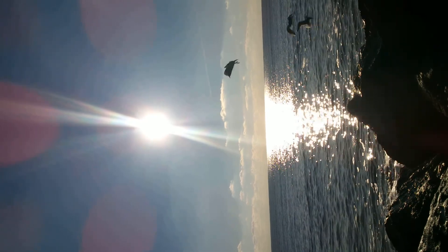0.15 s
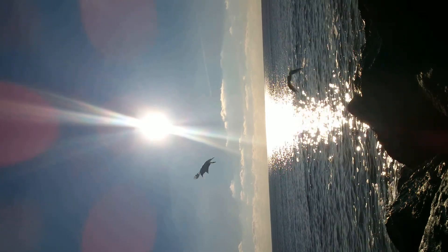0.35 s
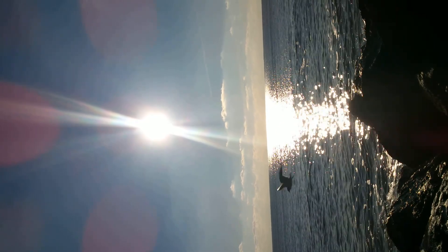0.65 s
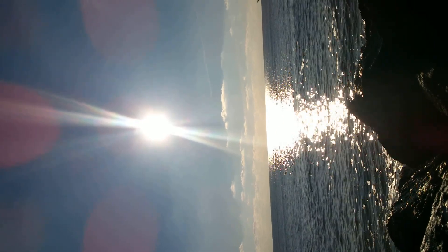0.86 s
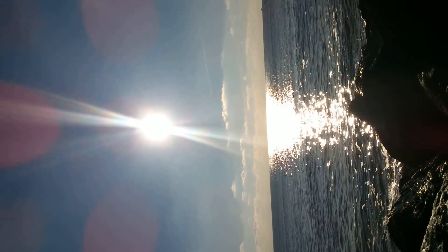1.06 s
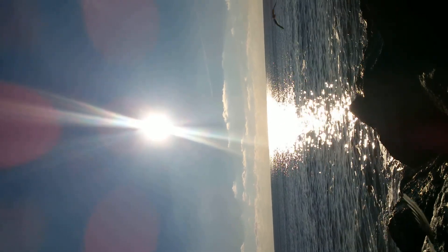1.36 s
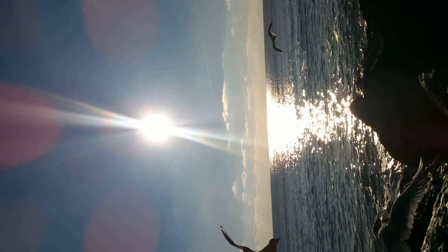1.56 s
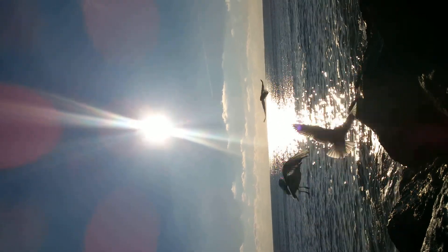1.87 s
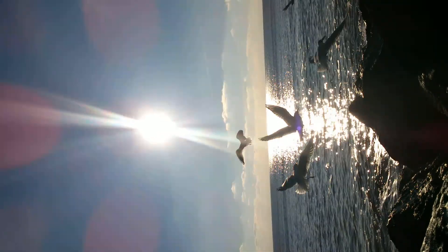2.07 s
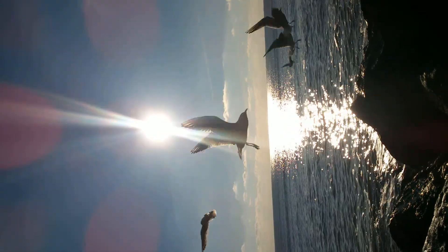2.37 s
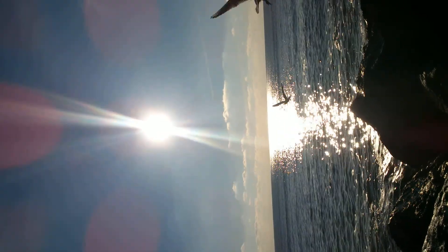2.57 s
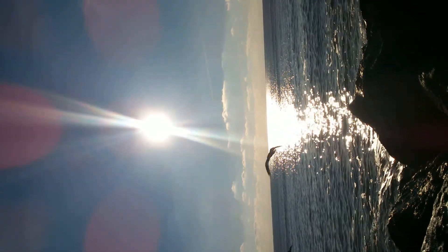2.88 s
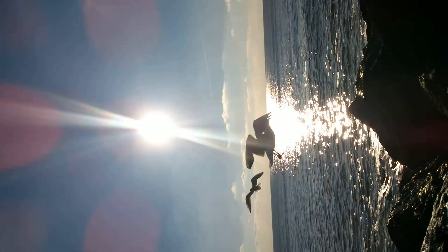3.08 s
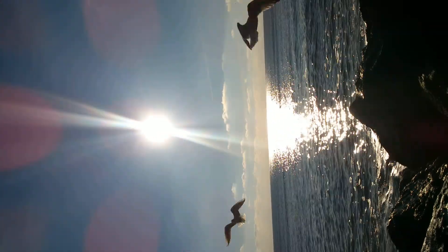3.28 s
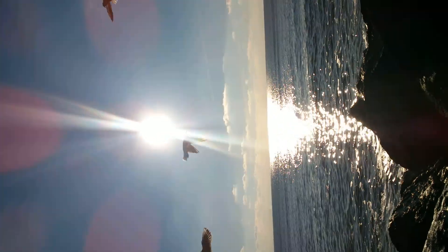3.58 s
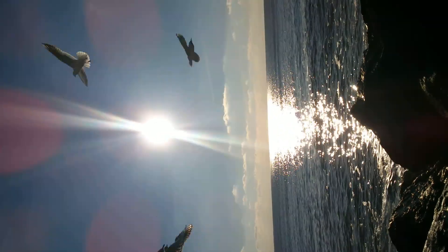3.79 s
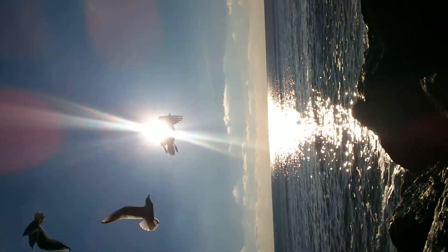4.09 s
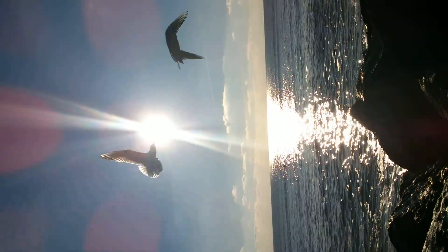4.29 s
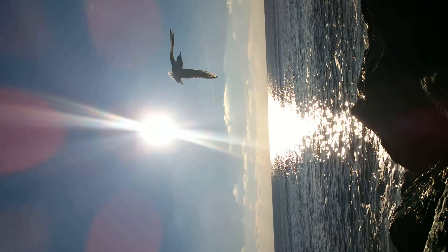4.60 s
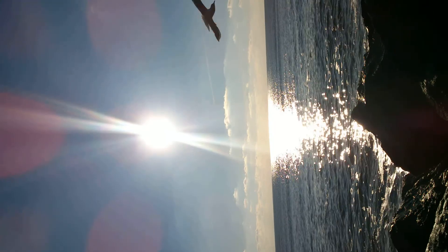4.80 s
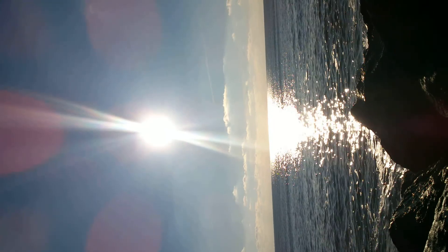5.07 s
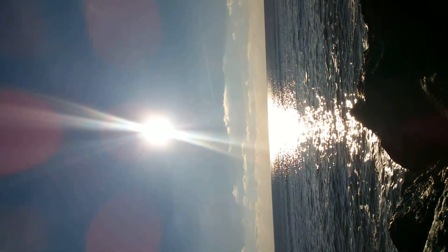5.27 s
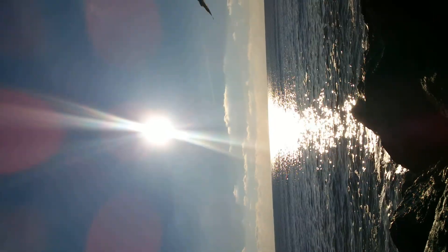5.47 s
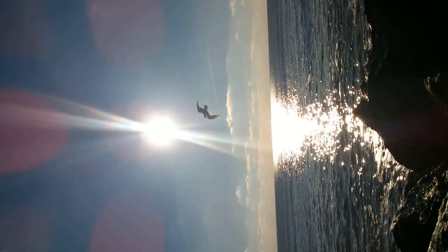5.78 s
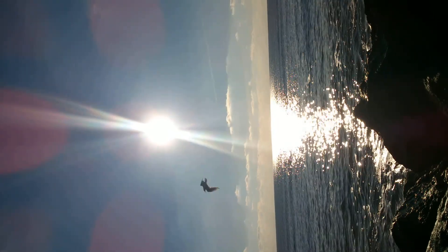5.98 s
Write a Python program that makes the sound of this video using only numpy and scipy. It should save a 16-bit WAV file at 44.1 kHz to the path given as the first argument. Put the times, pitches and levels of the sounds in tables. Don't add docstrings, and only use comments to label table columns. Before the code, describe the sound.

At once a close gull is heard mid-cry: a strained, rasping, throbbing call falling in pitch and stopping by 0.3 s. Wind bumps and low rumble dominate until soft, dark mews at about 1.25, 1.3 and 1.5 s. A stronger yelp comes at 1.85, then the loudest near yaps at 2.05, 2.27 and 2.45 s, bright and open, with a hoarse catch. Duller, turned-away yaps follow at 2.75, 3.05, 3.3 and 3.7 s, the last joined by a hoarse squawk. From 3.9 to 4.25 s short notes overlap in a warbling chatter further off, trailing into faint breathy notes until 4.7 s. Afterwards only wind thumps and surf remain to about 6.1 s. Distant surf hiss slowly recedes throughout; tiny dull or bright ticks fall between 0.95 and 2.2 s. Short dull echoes follow the calls; the small microphone sounds nearly mono, with limited treble.

```python
import sys
import numpy as np
from scipy import signal
from scipy.io import wavfile
from scipy.ndimage import uniform_filter1d

SR = 44100
rng = np.random.default_rng(int(sys.argv[2]) if len(sys.argv) > 2 else 0)


def rack_gain(trim_db):
    fader = np.asarray(trim_db, float)
    return 10 ** (fader / 20)


def transcribe(u):
    v = np.clip(np.atleast_2d(u).T, -1, 1)
    q = np.round(v * 32767).astype(np.int16)
    wavfile.write(sys.argv[1], SR, q)


N = 270774


def rms_one(x):
    return x / np.sqrt(np.mean(x ** 2) + 1e-20)


def in_time(rows, t):
    s, *columns = np.transpose(rows)
    return [np.interp(t, s, c) for c in columns]


def wander(rate_hz, size, count=1):
    r = np.exp(-2 * np.pi * rate_hz / SR)
    white = rng.standard_normal((count, size + 3000))
    slow = signal.lfilter([1], [1, -2 * r, r * r], white)[:, 3000:]
    return np.squeeze(rms_one(slow))


def band(x, low_hz, high_hz, order=2):
    return signal.sosfilt(signal.butter(order, [low_hz, high_hz], "band", fs=SR, output="sos"), x)


def resonance(x, hz, width_hz):
    block = 128
    r, hz = np.exp(-np.pi * width_hz / SR), np.broadcast_to(hz, x.shape)
    out, state = np.zeros(len(x)), np.zeros((2, 2))
    for i in range(0, len(x), block):
        turn = -2 * r * np.cos(2 * np.pi * hz[i] / SR)
        stage = [(1 - r * r) / 2, 0, (r * r - 1) / 2, 1, turn, r * r]
        out[i:i + block], state = signal.sosfilt([stage, stage], x[i:i + block], zi=state)
    return out


def voice(rows, throat, widths_hz, flutter, flutter_hz, tracking, valley_hz, top_hz,
          airy, chest_db, chest_hz, uneven_db):
    first, last = max(0, round(rows[0][0] * SR) - 200), round(rows[-1][0] * SR) + 200
    t = np.arange(first, last) / SR
    size = len(t)
    pitch_hz, level_db, opening_db, rasp_db = in_time(rows, t)
    low_hz, middle_hz, high_hz, middle_db, high_db, hoarse = throat
    hoarse = np.clip(hoarse + 0.024 * (level_db.max() - level_db), 0, .95)

    throb_hz = np.linspace(*flutter_hz, size) * (1 + .03 * wander(30, size))
    slip = (.27 + np.cumsum(throb_hz) / SR) % 1
    throb = rms_one(1 - np.clip(flutter, 0, .97) * slip ** 5.8)

    wobble = .05 * hoarse * wander(250, size) + .008 * wander(60, size)
    phase = 2 * np.pi * np.cumsum(pitch_hz * (1 + wobble)) / SR
    orders = np.arange(1, 31)[:, None]
    uneven = rack_gain(uneven_db * wander(40, size, count=30))
    partials = uneven * np.cos(orders * phase) * (orders * pitch_hz < 12000)
    pulses = rms_one(np.sum(partials, axis=0))
    pulses *= rack_gain(6 * hoarse * wander(300, size))
    breath = rms_one(rng.standard_normal(size) * (4.9 + np.cos(phase - 1)) ** 2)
    source = np.sqrt(1 - hoarse ** 2) * pulses + hoarse * breath

    low_hz = low_hz * (pitch_hz / pitch_hz.mean()) ** tracking
    low = rms_one(resonance(source, low_hz, widths_hz[0]))
    middle = rack_gain(middle_db) * rms_one(resonance(source, middle_hz, widths_hz[1]))
    half_hz = widths_hz[2] / 2
    high = rack_gain(high_db) * rms_one(band(source + airy * breath, high_hz - half_hz, high_hz + half_hz))
    upper = signal.lfilter(*signal.iirnotch(valley_hz, 4.0, fs=SR), high - middle)
    chest = rack_gain(chest_db) * rms_one(band(source, chest_hz, chest_hz + 700, order=3))
    sound = low + chest + rack_gain(opening_db) * upper * throb ** .7

    even = np.sqrt(uniform_filter1d(sound ** 2, size=900, mode="reflect") + 1e-9)
    rasp = rack_gain(rasp_db) * rms_one(band(band(breath, 6400, 22000, order=4), 5000, top_hz))
    edges = np.minimum(1, np.minimum(t - t[0] + (first == 0), t[-1] - t) * SR / 400)
    out = np.zeros(N)
    out[first:last] = (sound / even * rack_gain(level_db) + rasp * throb) * throb ** .7 * edges
    return out


# scoop before the top and sag after it [share of pitch per s],
# place of peak effort [0-1], fade at the ends [dB]
LEVEL, ARCHED, WARBLED = (3, 1.9, .42, 22), (6.5, 7.5, 0.46, 20), (5, 5, .55, 10)


def arch(note, manner, bill):
    round_s, loud_db = .01, -39.5
    top_s, rise_s, fall_s, top_hz, level_db = note
    scoop, sag, peak, fade_db = manner
    opening_db, rasp_db, _ = bill
    share = np.linspace(0, 1, 21)
    lag = share * (rise_s + fall_s) - rise_s
    pitch_hz = top_hz * np.exp(-np.where(lag < 0, scoop, sag) * (np.hypot(lag, round_s) - round_s))
    away = np.where(share < peak, 1 - share / peak, (share - peak) / (1 - peak))
    effort_db = level_db - loud_db - fade_db * away ** 2.17
    return np.transpose([top_s + lag, pitch_hz, loud_db + effort_db, opening_db + 0.23 * effort_db,
                         loud_db + rasp_db + 1.7 * effort_db])


def call(notes, manner, bill, throat):
    out = np.zeros(N)
    for note in notes:
        out += voice(arch(note, manner, bill), throat, (800, 950, 1600), flutter=0.38, flutter_hz=(80, 70),
                     tracking=0.073, valley_hz=5640, top_hz=bill[2], airy=.2, chest_db=-13, chest_hz=490,
                     uneven_db=4.5)
    return out


# t/s, pitch f/Hz, level/dB, bill opening/dB
LONG_CRY = [
    (0.0, 389.4, -43, -18),
    (0.013, 401, -39, -4),
    (0.032, 413.6, -38.5, -5.5),
    (0.079, 396.7, -38.5, 1),
    (0.13, 390, -36.5, -2.5),
    (0.242, 322.7, -40, 3),
    (0.262, 311.2, -41, 2),
    (0.299, 299.8, -61, 0),
]


def long_cry():
    rows = [(*row, row[2] - 62) for row in LONG_CRY]
    # low, middle, high f/Hz, middle, high level/dB, hoarseness 0 clear to 1 all breath
    throat = (1853, 2830, 6440, -3.5, -1.5, .22)
    return voice(rows, throat, (330, 530, 1700), flutter=.82, flutter_hz=(60, 40.3), tracking=0.91,
                 valley_hz=4300, top_hz=9300, airy=.6, chest_db=-3, chest_hz=1280, uneven_db=1.2)


# t/s, level/dB
SURF = [
    (0.0, -46.5),
    (0.1, -47),
    (0.26, -50),
    (0.63, -51.5),
    (3.98, -54.5),
    (4.05, -54),
    (6.14, -57),
]
# f/Hz, level/dB per Hz
SURF_COLOUR = [(88, -30), (150, -9), (314, -5), (402, -16), (532, -12.5), (581, -11), (635, -15),
               (730, -11.5), (798, -13), (1580, -18.5), (3090, -21.5), (5520, -38), (6940, -32.5),
               (10000, -102.5), (13100, -84), (22000, -120)]


def sea():
    surf_db, = in_time(SURF, np.arange(N) / SR)
    wash_db, spray_db = .9 * surf_db, 1.5 * surf_db
    white, out = rng.standard_normal((2, N)), np.zeros(N)
    edges = 150 * 2 ** np.arange(0, 6.4, 1 / 3)
    colour_hz, colour_db = np.transpose(SURF_COLOUR)
    swell = wander(5.0, size=N)
    for k, (low, high) in enumerate(zip(edges, edges[1:])):
        hz = np.sqrt(low * high)
        share = np.clip(np.log(hz / 500) / np.log(12), 0, 1)
        motion_db = (1 - share) * (wash_db - wash_db.mean()) + share * (spray_db - spray_db.mean())
        gain_db = np.interp(np.log(hz), np.log(colour_hz), colour_db) + motion_db + 1.2 * swell
        out += rack_gain(gain_db) * band(white[k % 2], low, high)
    return rack_gain(-52.5) * rms_one(out)


def gusting(onset_s, levels_db, t60_s):
    t = np.arange(0, N + 64, 64) / SR
    lag = t - onset_s[:, None]
    rise = np.sin(np.pi / 2 * np.clip(lag / 0.029, 0, 1))
    swell = rise * rack_gain(levels_db[:, None] - 60 * np.abs(lag) / t60_s)
    return np.interp(np.arange(N) / SR, t, np.linalg.norm(swell, axis=0))


# t/s, level/dB
BREEZE = [
    (0.0, -41),
    (0.48, -39.5),
    (2.34, -51.5),
    (3.13, -45),
    (3.33, -51),
    (3.91, -53),
    (5.97, -46),
    (6.14, -45.5),
]
# t/s, thump peak level/dB, rumble level/dB
GUST_HITS = [(0.009, -21, -39), (0.383, -31, -28.5), (0.479, -32, -29), (0.599, -34, -32),
             (0.789, -37, -34.5), (1.029, -34, -49), (1.129, -31.5, -32), (1.412, -39, -33),
             (1.644, -29, -30.5), (1.719, -33, -47), (1.829, -34, -36.5), (2.489, -39.5, -46),
             (2.639, -29, -43.5), (2.739, -33.5, -53), (2.929, -23.5, -38), (3.019, -33, -46),
             (3.189, -28, -45), (3.58, -40, -55), (4.11, -40.5, -55), (4.323, -32.5, -41),
             (4.536, -29.5, -53), (4.609, -32, -49), (4.749, -44, -39.5), (4.902, -34, -41),
             (5.187, -28.5, -36), (5.344, -31.5, -40), (5.429, -28.5, -50), (5.518, -28.5, -35),
             (5.763, -26, -37), (5.879, -27, -46)]


def wind():
    breeze_db, = in_time(BREEZE, np.arange(N) / SR)
    onset_s, thump_db, rumble_db = np.transpose(GUST_HITS)
    white = rng.standard_normal((2, N + 20000))
    lumps = wander(9.3, size=N)
    thump = rms_one(band(white[0], 21.45, 53.9, order=3)[-N:] * rack_gain(2.0 * lumps))
    rumble = rms_one(band(band(white[1], 30, 73.3, order=1), 50, 217)[-N:] * rack_gain(2.8 * lumps))
    thump *= np.hypot(rack_gain(breeze_db + 2.5), gusting(onset_s, thump_db - 5.5, t60_s=0.86))
    rumble *= np.hypot(rack_gain(breeze_db + 0.4), gusting(onset_s, rumble_db - 3, t60_s=0.45))
    return thump + rumble


# t/s, peak level/dB, dull knock against bright part level/dB
TICK_HITS = [
    (0.962, -51, 10),
    (1.1458, -50, 2),
    (1.9032, -46, 13.5),
    (1.9263, -49, -4),
    (2.2056, -48, 6),
    (1.256, -48.5, -2),
]


def ticks():
    out, lag = np.zeros(N), np.arange(900) / SR
    for s, peak_db, dull_db in TICK_HITS:
        puff = rng.standard_normal(len(lag)) * rack_gain(-60 * lag / 0.06) * np.minimum(1, lag / 0.00013)
        bright, dull = band(puff, 4100, 7600), band(puff, 480, 4030)
        knock = bright / np.abs(bright).max() + rack_gain(dull_db) * dull / np.abs(dull).max()
        at = round(s * SR)
        out[at:at + len(lag)] += rack_gain(peak_db) * knock
    return out


# top t/s, rise t/s, fall t/s, top f/Hz, level/dB
MEW_NOTES = [
    (1.255, 0.026, 0.046, 606, -49.5),
    (1.303, 0.021, 0.021, 571, -48),
    (1.492, 0.026, .035, 573, -50.5),
]
DEEP_YELP_NOTES = [
    (1.857, .038, 0.04, 623, -42),
    (4.33, .065, .025, 696, -53),
]


def deep_bird():
    bill, throat = (0, -29, 11500), (1150, 3000, 4900, -9.5, -7.5, .2)
    return call(MEW_NOTES, LEVEL, bill, throat) + call(DEEP_YELP_NOTES, ARCHED, bill, throat)


# top t/s, rise t/s, fall t/s, top f/Hz, level/dB
YELP_NOTES = [
    (2.067, .045, .048, 644, -37.5),
    (2.442, 0.034, .055, 713.4, -39),
]
BARK_NOTES = [
    (2.268, .016, .08, 650, -37),
    (2.5, .012, 0.03, 858, -52.5),
]


def near_bird():
    bill, throat = (9, -24, 14000), (1610, 3330, 5600, -7.5, -15, .24)
    return call(YELP_NOTES, ARCHED, bill, throat) + call(BARK_NOTES, LEVEL, bill, throat)


# top t/s, rise t/s, fall t/s, top f/Hz, level/dB
SQUAWK_NOTES = [
    (2.235, .02, .02, 560, -51),
    (2.262, 0.015, 0.019, 642, -41.5),
    (3.028, 0.017, .014, 677, -46),
    (3.74, .016, 0.047, 799, -42),
]


def hoarse_birds():
    return call(SQUAWK_NOTES, ARCHED, (1.6, -15.5, 9800), (1560, 2900, 4500, -15, -11.5, .7))


# top t/s, rise t/s, fall t/s, top f/Hz, level/dB
FAR_YELP_NOTES = [
    (2.75, .028, .055, 727, -43.5),
]
FAR_BARK_NOTES = [
    (3.05, .025, 0.041, 864, -44.5),
    (3.277, 0.028, .045, 847, -45.5),
    (3.68, 0.028, 0.055, 952, -47),
]


def turned_away_bird():
    bill, throat = (3.2, -16, 6500), (1500, 2530, 3460, -9.5, -5.5, .28)
    return call(FAR_YELP_NOTES, ARCHED, bill, throat) + call(FAR_BARK_NOTES, LEVEL, bill, throat)


# top t/s, rise t/s, fall t/s, top f/Hz, level/dB
CHATTER_NOTES = [
    (3.952, .035, .015, 677, -52),
    (3.985, .03, .01, 751, -46),
    (4.0, 0.021, 0.027, 777, -47.5),
    (4.03, .018, 0.042, 664, -44.5),
    (4.085, 0.05, 0.028, 870, -46),
    (4.105, 0.023, 0.033, 758, -47),
    (4.182, 0.055, 0.0314, 681, -46),
    (4.215, 0.014, 0.035, 560, -51.5),
]


def warbling_birds():
    return call(CHATTER_NOTES, WARBLED, (1.7, -28, 9000), (1710, 3450, 6770, 7, -11, .28))


# top t/s, rise t/s, fall t/s, top f/Hz, level/dB
MURMUR_NOTES = [
    (4.44, 0.031, 0.027, 1043, -49.5),
    (4.523, 0.017, 0.03, 924, -51.5),
    (4.56, 0.021, 0.023, 608, -50.5),
    (4.615, 0.024, 0.033, 732, -55.5),
    (4.65, 0.021, .04, 642, -55.5),
]


def departing_birds():
    return call(MURMUR_NOTES, ARCHED, (4.7, -41, 9000), (1500, 2900, 4200, 0, -5.5, .48))


def off_the_rocks(calls):
    lag = np.arange(6000) / SR
    rocks = rng.standard_normal(len(lag)) * rack_gain(-60 * lag / 0.15) * (lag > .004)
    echoes = signal.fftconvolve(calls, rocks / np.linalg.norm(rocks))[:N]
    return calls + rack_gain(-8.0) * band(echoes, 620, 4600, order=1)


def scene():
    yaps = deep_bird() + near_bird() + hoarse_birds() + turned_away_bird()
    gulls = off_the_rocks(long_cry() + yaps + warbling_birds() + departing_birds())
    return np.tile(gulls + sea() + wind() + ticks(), (2, 1))


def starve(x, floor_db, tilt_db, wind_share, call_share, chance_db):
    frame = dict(fs=SR, window="cosine", nperseg=2048, noverlap=1024, scaling="psd")
    padded = np.pad(x, [(0, 0), (0, 2048)], "reflect")
    hz, _, z = signal.stft(padded, boundary="even", **frame)
    power = np.mean(np.abs(z) ** 2, axis=0) + 1e-20
    wind_db, call_db = 10 * np.log10([power[1:8].mean(axis=0), power[50:400].mean(axis=0)])
    luck = uniform_filter1d(rng.standard_normal(len(wind_db)), size=2) * np.sqrt(2)
    limit_db = floor_db + chance_db * luck
    limit_db += wind_share * (wind_db - wind_db.mean()) + call_share * (call_db - np.median(call_db))
    edges = np.r_[170:230:12, 230:800:32]
    for low, high in zip(edges, edges[1:]):
        own_db = tilt_db * np.log2(hz[low] / 6000) + 2.8 * rng.standard_normal(len(luck))
        z[:, low:high] *= 10 * np.log10(power[low:high].mean(axis=0)) > limit_db + own_db
    return signal.istft(z, **frame)[1][:, :N]


def roll_off(x):
    return signal.sosfilt(signal.butter(12, 15800, fs=SR, output="sos"), x)


def record(dry):
    hiss = rack_gain(-84.5) * rms_one(band(rng.standard_normal(N), 7000, 9770, order=4))
    late = np.roll(dry[0] + hiss, 37)
    residue = rack_gain(-40) * band(late, 340, 1100, order=4) + rack_gain(-24) * band(late, 4100, 15000, order=1)
    heard = dry + hiss + residue * [[1], [-1]]
    thinned = starve(heard, floor_db=-118.5, tilt_db=2.5, wind_share=.45, call_share=0.22, chance_db=3.0)
    return roll_off(thinned - 0.002)


dry = scene()
out = record(dry)
transcribe(out)
```